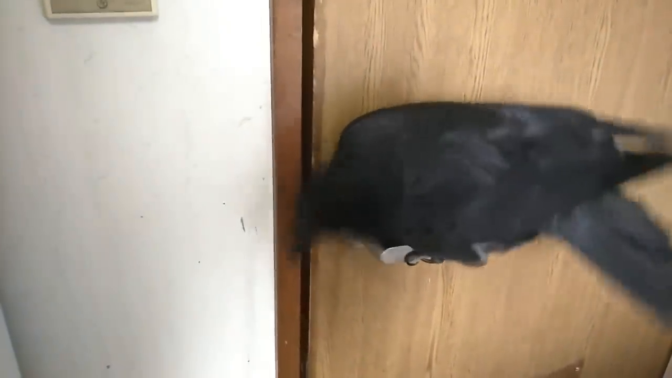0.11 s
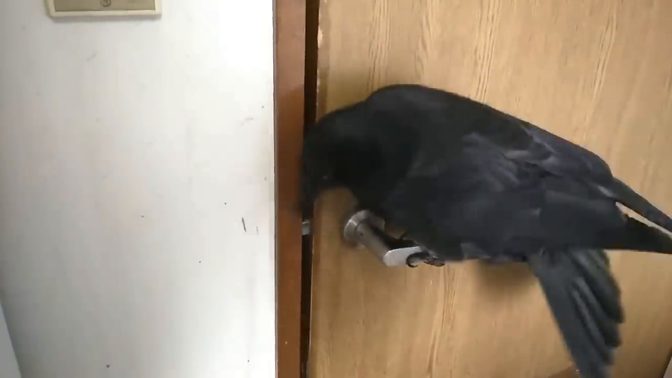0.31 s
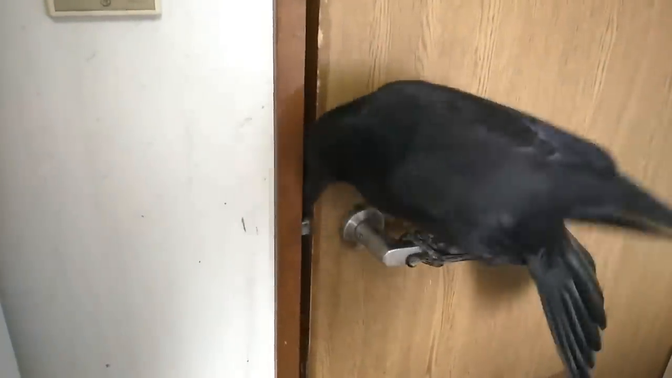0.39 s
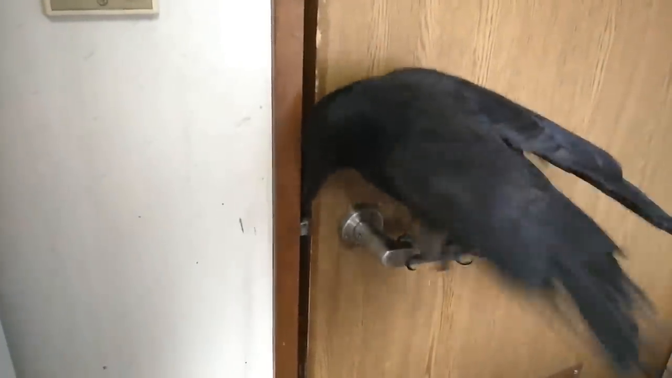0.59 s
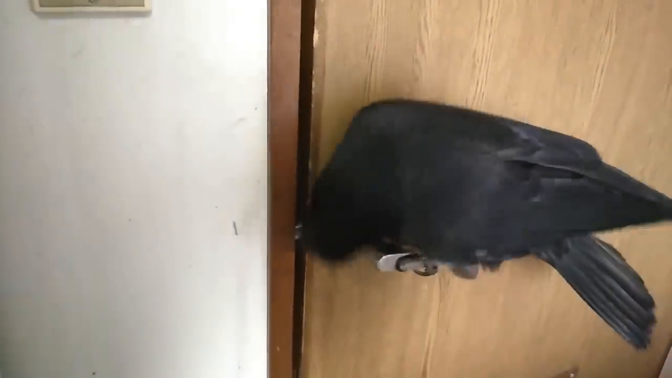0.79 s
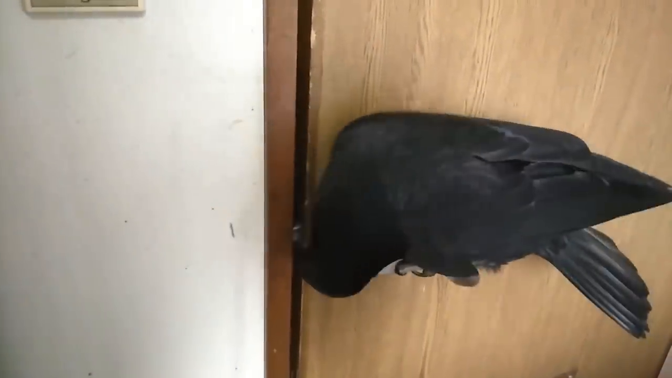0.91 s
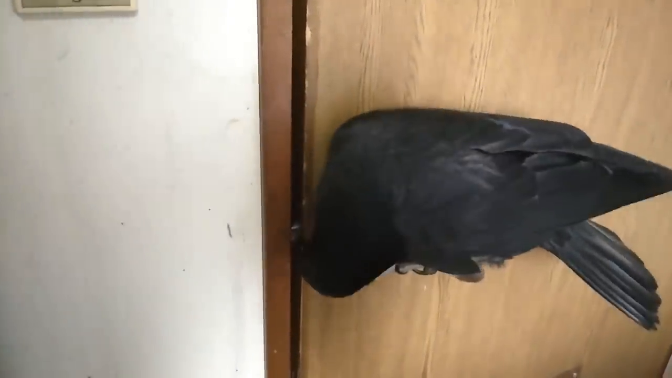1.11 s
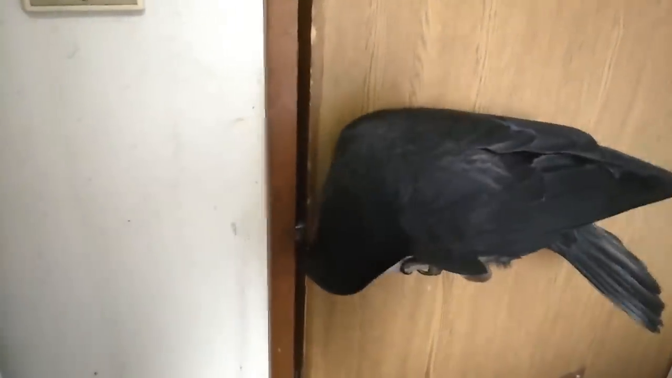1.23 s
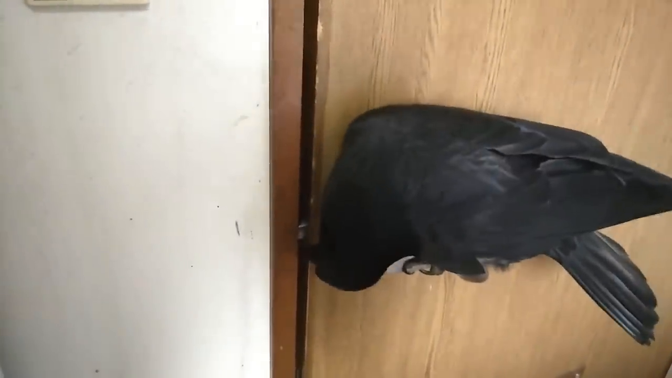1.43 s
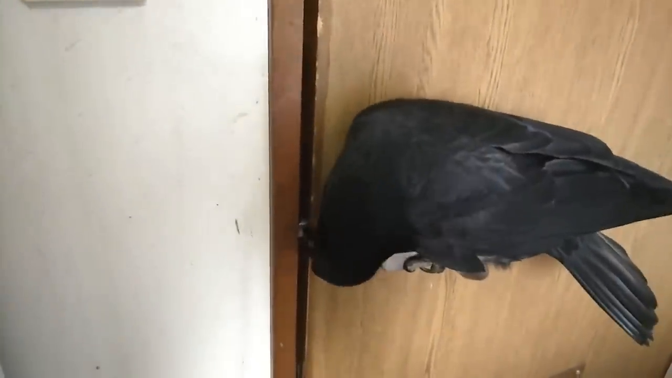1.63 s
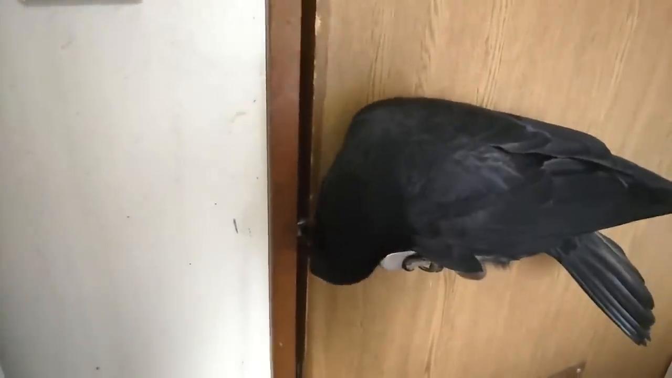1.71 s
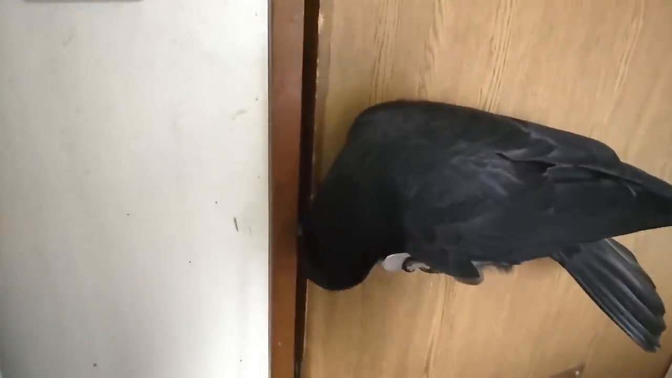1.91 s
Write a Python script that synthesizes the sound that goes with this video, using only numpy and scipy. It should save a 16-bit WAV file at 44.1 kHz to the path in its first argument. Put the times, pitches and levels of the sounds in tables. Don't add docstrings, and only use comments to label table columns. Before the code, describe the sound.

A door latch scrapes briefly and clacks hard with a quick rattle, then a crow's wings flap, claws tick the metal lever, and its beak knocks the door twice, close up in a small hissy room.

```python
import sys
import numpy as np
from scipy import signal
from scipy.fft import rfft, irfft
from scipy.io import wavfile
from scipy.ndimage import uniform_filter1d

SR = 44100
rng = np.random.default_rng(int(sys.argv[2]) if len(sys.argv) > 2 else 0)


def digitize_waveform(pressure):
    field = np.atleast_2d(pressure).T
    bounded = np.clip(field, -1, 1)
    quanta = np.round(bounded * 32767).astype(np.int16)
    wavfile.write(sys.argv[1], SR, quanta)


def volts_from_decibels(level):
    exponent = np.asarray(level, float) / 20
    return 10 ** exponent


N = 88200
t = np.arange(N) / SR
freq = np.maximum(np.arange(N // 2 + 1) * SR / N, 1)

# pitch_hz, level_db (per Hz)
HISS_COLOUR = [(25, -10), (60, -8), (150, -1), (400, -10), (1000, -12), (8500, -20.5), (11000, -25.5),
               (15000, -40)]
# start_s, rise_s, level_db
LEAF_SWAYS = [(0, 0.072, -53.5), (0.121, .04, -61), (.24, 0.047, -52), (.33, 0.05, -52), (.45, .04, -53),
              (0.642, 0.059, -51), (.7, 0.037, -58), (0.812, 0.018, -45), (.86, .02, -57),
              (1.22, .025, -57), (1.39, 0.027, -58), (1.47, .02, -64.5), (1.57, .03, -66.5),
              (1.81, 0.044, -53), (1.89, 0.027, -56.5), (1.96, 0.015, -59)]
# start_s, rise_s, fall_t60_s, rustle_db, pushed_air_db
WING_MOVES = [
    (.0, 0.012, 0.84, -57.5, -55.5),
    (0.15, 0.0042, 0.53, -54.5, -47.5),
    (0.441, 0.062, 0.6, -64, -50.5),
    (0.525, 0.029, 0.69, -50.5, -49.5),
    (0.622, 0.005, 0.36, -42.5, -40),
    (0.634, 0.026, 0.14, -33.5, -36),
    (0.772, 0.0046, 0.48, -49, -44.5),
    (0.931, 0.012, 0.19, -55, -51),
    (1.471, 0.024, 0.18, -74, -54),
    (1.949, 0.02, 0.27, -55, -59),
]
# start_s, rise_s, fall_t60_s, level_db
FEATHER_SLIDES = [
    (0.801, 0.11, 0.8, -50),
    (.93, 0.11, 0.09, -55.5),
    (1.21, 0.049, 0.11, -52.5),
    (1.389, 0.016, 0.25, -60.5),
    (1.48, 0.037, 0.4, -57.5),
    (1.61, 0.031, 0.23, -59.5),
]
# pitch_hz, level_db (per Hz)
RUSTLE_COLOUR = [(710, -39), (1200, -16), (1470, -18.5), (2620, -5.5), (3530, -10.5), (8750, -3.5),
                 (13900, -19.5), (15000, -46.5)]
# pitch_hz, level_db (per Hz)
AIR_COLOUR = [(30, -20), (70, -10), (100, -4.5), (130, -0.5), (330, 0.5), (520, -6.5), (930, -8),
              (1500, -22)]
# pitch_hz, level_db (per Hz)
SLIDE_COLOUR = [(1500, -17), (3000, -6.5), (6000, -4), (8300, 2), (9600, -2), (12000, -14.5), (14500, -22)]
# start_s, level_db, upper_modes_db
CLAW_TICKS = [
    (0.15, -53, -12),
    (0.63, -36.5, 11.5),
    (.774, -31.5, -2.5),
    (0.789, -38, -8),
    (0.821, -41, -16),
]
# pitch_hz, level_db, t60_s
LEVER_MODES = [(8700, -8, 0.017), (10960, -4, 0.044), (12800, -2.5, 0.015), (14000, -24, .015)]
# start_s, level_db, pitch_hz
DULL_BUMPS = [(0.129, -44, 154.7), (0.537, -42.5, 275), (.545, -43, 132.7), (0.691, -44, 342),
              (0.6215, -40.5, 205), (.643, -43, 297), (.656, -34, 232.3), (0.673, -45, 323),
              (0.777, -40, 110.5), (0.809, -43.5, 323), (.852, -43.5, 131), (0.865, -44, 99),
              (0.879, -52.5, 121), (1.186, -42.5, 108), (1.231, -44.5, 116), (1.289, -57, 110),
              (1.854, -43, 223.4), (1.875, -47, 132.2), (1.91, -49.5, 120), (0.439, -44, 147),
              (0.559, -46.5, 294), (.15, -48, 123), (0.502, -44, 142), (1.828, -49.5, 125),
              (1.96, -58, 155), (1.488, -48, 99), (1.578, -51.5, 90.5)]
# start_s, rise_s, fall_t60_s,
# level_db
GRIT_SWELLS = [
    (0, 0.0033, 0.79, -57),
    (1.345, 0.011, 0.29, -56.5),
    (1.954, 0.018, .2, -55.5),
]
# pitch_hz, level_db (per Hz)
SPRING_COLOUR = [(180, -8), (300, -20), (480, -10), (1030, -3), (1560, -14), (1750, -10), (9000, -29),
                 (11700, -62.5), (19800, -120)]
# start_s, level_db, crack_db, treble_db, door_thud_db
LOW_PECKS = [(1.1828, -27.5, -6, 0, -13), (1.1865, -40.5, -6, 6, -7), (1.1935, -33, -3.5, -2, -11.5),
             (1.202, -41.5, -5, -1, -3.5), (1.224, -39, -3, -16, -16), (1.238, -45, -16, -19, -13),
             (1.257, -34.5, -22, -27, -21), (1.268, -40.5, -19, -28, -23), (1.289, -54, -12, -6, -22),
             (1.349, -48, -21, -9, -30), (1.37, -54, -20, -10, -20)]
# start_s, level_db, crack_db, treble_db, door_thud_db
HIGH_PECKS = [
    (1.8072, -33.5, -2.5, -3.5, -26),
    (1.815, -38.5, 1, 2, -22),
    (1.822, -36.5, -10.5, 2, -15),
    (1.841, -35.5, -6, -6, -16),
    (1.857, -37, -7, -12.5, -11),
    (1.878, -43.5, -21, -20, -4.5),
    (1.962, -62, 10, 2, -13),
    (1.974, -48, 4.5, 1, -10),
    (1.981, -49.5, 5.5, -10, -4),
]
# pitch_hz, level_db, t60_s
LOW_EDGE_MODES = [(418, -10, 0.019), (552, -9, 0.06), (650, -2.5, 0.046), (890, -6.5, 0.058),
                  (1072, -0.5, .08), (1179, 2, 0.047), (1322, -2.5, 0.043), (2020, 1, .03),
                  (2320, -7, 0.019), (3520, -10, 0.01), (4750, -2.5, 0.017)]
# pitch_hz, level_db, t60_s
HIGH_EDGE_MODES = [(647, 6, 0.046), (766, -2, 0.052), (1029, 1, 0.05), (1290, 4, 0.027), (1450, 7, 0.022),
                   (1565, 2.5, 0.029), (2310, -2.5, 0.037), (2880, -15, 0.012), (3480, 4, 0.014),
                   (4670, 2, 0.016), (5180, -4, 0.014)]
# start_s, level_db, crack_db, treble_db, door_thud_db
LATCH_BLOWS = [
    (0.2194, -9, 2, 3.5, -21),
    (0.2243, -14.5, 3, -5, -9.5),
    (.2280, -13, 4, 1, -8.5),
    (0.2355, -19, 1, -1, -6.5),
    (.2415, -20, -1.5, -2.5, -12.5),
    (.2545, -19.5, 2.5, -5, -14),
]
# pitch_hz, level_db, t60_s
LATCH_MODES = [(578, -8, 0.072), (670, -2, 0.089), (784, -4, 0.045), (1004, 1, 0.073), (1208, -3, 0.099),
               (1366, -20, 0.027), (1588, 7, 0.0089), (1610, -6, 0.018), (1827, -9, 0.041),
               (2510, -1, 0.024), (2930, -2, 0.012), (3290, -6, 0.034), (5520, -6.5, 0.015),
               (7860, -6.5, 0.049)]
# pitch_hz, level_db, t60_s
DOOR_MODES = [(110, -13, 0.11), (193.4, -8, .22), (222, -7, 0.14), (255.6, 2.5, 0.05), (315, -2, 0.07),
              (392.7, 0.5, .11), (471, -4, 0.071)]
# pitch_hz, level_db (per Hz)
CRACK_COLOUR = [(150, -56.5), (680, 0), (1300, -1), (1750, 1), (2700, -3), (4210, -11), (8250, -9.5),
                (14500, -31)]
# pitch_hz, t60_s
ROOM_DECAY = [(100, 0.49), (300, 0.45), (700, 0.36), (1500, 0.36), (3500, 0.39), (7000, 0.39),
              (13000, 0.25)]
# pitch_hz, correlation (0 to 1)
PORT_LIKENESS = [(60, 0.75), (350, 0.85), (520, 0.85), (800, 0.17), (15000, 0.022)]
# pitch_hz, left_minus_right_db
PORT_BALANCE = [(100, -1), (600, 3.5), (1100, -1), (4000, -0.5), (9000, -0.5), (12500, 8)]


def curve(table, hz):
    table = np.array(table, float)
    return np.interp(np.log(hz), np.log(table[:, 0]), table[:, 1])


def unit(x):
    return x / np.sqrt(np.mean(x ** 2))


def noise(colour):
    likeness = np.clip(curve(PORT_LIKENESS, freq), 0, 1)
    mid, side = rfft(rng.standard_normal((2, N))) * volts_from_decibels(curve(colour, freq))
    opposite = np.array([[1], [-1]])
    return unit(irfft(mid * np.sqrt(1 + likeness) + side * np.sqrt(1 - likeness) * opposite, N))


def walk(rate_hz):
    hold = int(SR / rate_hz)
    levels = np.repeat(rng.standard_normal(N // hold + 1), hold)
    return unit(uniform_filter1d(levels, hold)[:N])


def fall(since, t60):
    return (since >= 0) * volts_from_decibels(-60 * np.maximum(since, 0) / t60)


def swell(start, rise, t60):
    return np.clip((t - start) / rise, 0, 1) * volts_from_decibels(-60 * np.maximum(t - start - rise, 0) / t60)


def swells(rows):
    return sum(volts_from_decibels(db) * swell(start, rise, t60) for start, rise, t60, db in rows)


def add(out, start, x):
    i = int(start * SR)
    out[:, i:i + x.shape[-1]] += x[..., :N - i]


def high_pass(x, order, hz):
    return signal.sosfilt(signal.butter(order, hz, "high", fs=SR, output="sos"), x)


def ring(since, modes, gains_db, turn=0., rise_cycles=0.):
    out = 0
    for k, ((hz, db, t60), gain_db) in enumerate(zip(modes, gains_db)):
        decay = fall(np.maximum(since - rise_cycles / hz, 0), t60)
        build = np.minimum((since * hz + 1e-3) / (rise_cycles + 1e-3), 1) ** 2
        tone = np.sin(2 * np.pi * hz * since + turn * np.cos(np.pi * k))
        out = out + volts_from_decibels(db + gain_db) * decay * tone * build
    return out


def hiss():
    return volts_from_decibels(-55.5 + 1.0 * walk(5.96)) * noise(HISS_COLOUR)


def room(x):
    rise_s = 0.0046
    white, tail = rfft(noise([(20, 0), (20000, 0)])), 0
    for hz in 50 * 2 ** np.arange(0, 8.6, .5):
        band = np.cos(np.pi * np.clip(np.log2(freq / hz), -.5, .5)) ** 2
        t60 = curve(ROOM_DECAY, hz)
        tail = tail + irfft(white * band, N) * fall(t, t60) / np.sqrt(t60 * SR / 14)
    tail = tail[:, :N // 2] * np.minimum(t[:N // 2] / rise_s, 1)
    return signal.fftconvolve(x, tail, axes=1)[:, :N]


def sway():
    sway_hz, drift, t60_s = 53, .06, 0.23
    push = sum(volts_from_decibels(db) * swell(start, rise, t60_s) for start, rise, db in LEAF_SWAYS)
    return push * np.sin(2 * np.pi * np.cumsum(sway_hz * (1 + drift * walk(9))) / SR)


def wings():
    rustle = swells([(start, rise, t60, db) for start, rise, t60, db, _ in WING_MOVES])
    air = swells([(start, 0.29 * rise, t60 + rise, db) for start, rise, t60, _, db in WING_MOVES])
    slide = swells(FEATHER_SLIDES)
    rustle = rustle * volts_from_decibels(2 * walk(280)) * noise(RUSTLE_COLOUR)
    air = air * volts_from_decibels(2 * walk(58.67)) * noise(AIR_COLOUR)
    slide = slide * volts_from_decibels(0.49 * walk(170)) * noise(SLIDE_COLOUR)
    return rustle + air + slide


def claws():
    out, since = np.zeros((2, N)), t[:N // 10]
    foot_t60_s = 0.14
    mode_share = np.array([0.67, 0.093, 0.8, 0.89])
    for start, db, upper_db in CLAW_TICKS:
        add(out, start, volts_from_decibels(db) * ring(since, LEVER_MODES, upper_db * mode_share))
    for start, db, hz in DULL_BUMPS:
        bump = [(hz, 0, foot_t60_s), (1.35 * hz, -4, foot_t60_s)]
        add(out, start, volts_from_decibels(db) * ring(since, bump, [0, 0]))
    return out


def spring():
    start_s, rise_s, end_s = 0.14, 0.027, .2195
    drag = volts_from_decibels(-41.5) * np.clip((t - start_s) / rise_s, 0, 1) * (t < end_s)
    drag = drag + swells(GRIT_SWELLS)
    return volts_from_decibels(2.4 * walk(200)) * drag * noise(SPRING_COLOUR)


def blows(rows, modes):
    crack_t60_s, treble_hz, upper_modes_hz = 0.041, 2480, 1550
    thud_rise_s, metal_low_hz, scatter_db = 0.012, 358, 1
    scatter = scatter_db * rng.standard_normal((len(rows), 2, 14))
    crack, since = noise(CRACK_COLOUR), t[:N // 6]
    treble = high_pass(crack, 2, treble_hz)
    hard, thud = np.zeros((2, 2, N))
    upper = np.array(modes)[:, 0] > upper_modes_hz
    for (start, db, crack_db, treble_db, thud_db), chance in zip(rows, scatter):
        first = int(start * SR / 2)
        part = slice(first, first + len(since))
        grit = crack[:, part] + (volts_from_decibels(treble_db) - 1) * treble[:, part]
        snap = volts_from_decibels(crack_db) * fall(since, crack_t60_s) * grit
        tones = np.array([ring(since, modes, port[:len(modes)] + treble_db * upper, turn, rise_cycles=2.38)
                          for port, turn in zip(chance, [np.pi / 4, -np.pi / 4])])
        add(hard, start, volts_from_decibels(db) * (tones / 2 + snap))
        leaf = np.minimum(since / thud_rise_s, 1) * ring(since, DOOR_MODES, chance[0])
        add(thud, start, volts_from_decibels(db + thud_db) * leaf)
    return high_pass(hard, 4, metal_low_hz), thud


def scene():
    latch, latch_thud = blows(LATCH_BLOWS, LATCH_MODES)
    low, low_thud = blows(LOW_PECKS, LOW_EDGE_MODES)
    high, high_thud = blows(HIGH_PECKS, HIGH_EDGE_MODES)
    metal = latch + spring()
    pecks = low + high
    door = latch_thud + low_thud + high_thud
    grip, bird = claws(), wings()
    wet = room(volts_from_decibels(2.5) * metal + volts_from_decibels(-3.5) * pecks + volts_from_decibels(1.5) * door + volts_from_decibels(-9) * grip + volts_from_decibels(-6) * bird)
    return metal + pecks + door + sway() + grip + bird + wet + hiss()


def band_limit(x):
    return signal.sosfilt(signal.butter(12, 15260, fs=SR, output="sos"), x)


def record(dry):
    notch_hz, notch_width_hz, notch_db = 10080, 190, -20
    clip, low_cut_hz, top_hz = 1.04, 40, 14700
    notch = notch_db / (1 + ((freq - notch_hz) / notch_width_hz) ** 2)
    balance = curve(PORT_BALANCE, freq) * np.array([[.5], [-.5]])
    x = irfft(rfft(dry) * volts_from_decibels(notch + balance), N)
    x = high_pass(clip * np.tanh(x / clip), 4, low_cut_hz)
    x = signal.sosfilt(signal.ellip(8, .3, 60, top_hz, fs=SR, output="sos"), x)
    return band_limit(x)


dry = scene()
out = record(dry)
digitize_waveform(out)
```